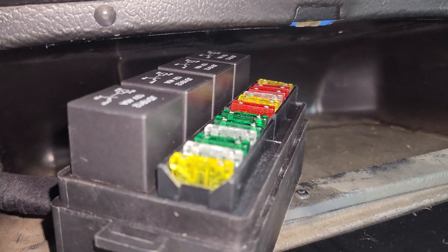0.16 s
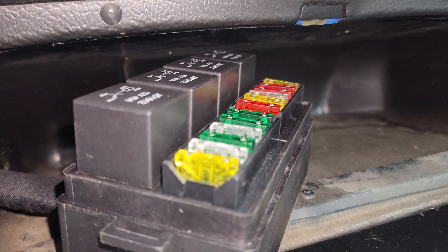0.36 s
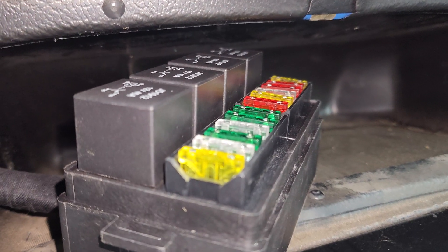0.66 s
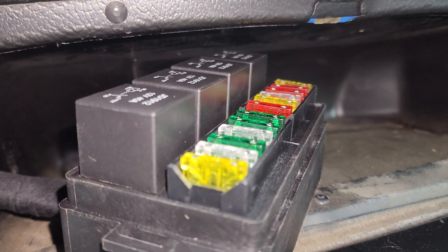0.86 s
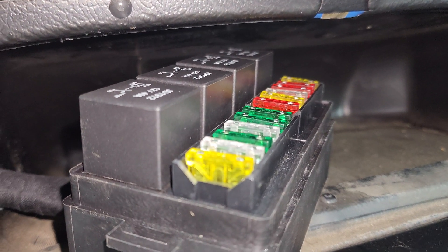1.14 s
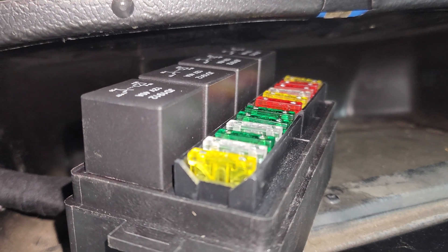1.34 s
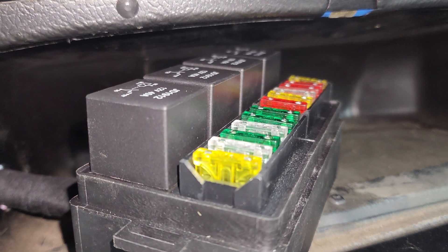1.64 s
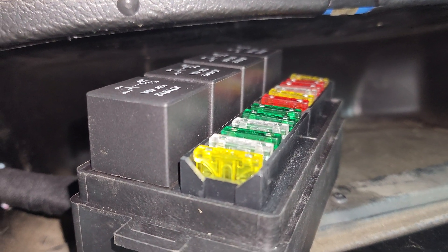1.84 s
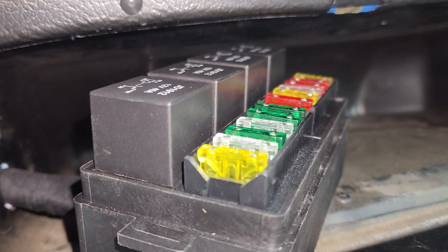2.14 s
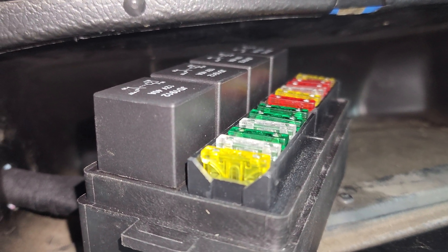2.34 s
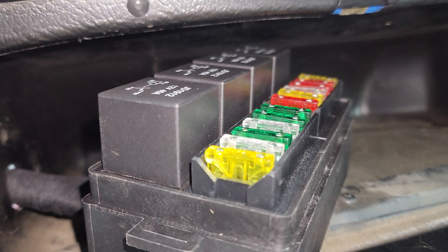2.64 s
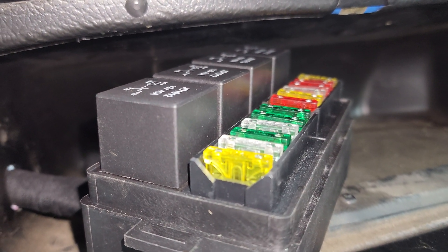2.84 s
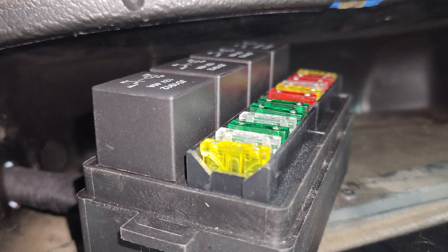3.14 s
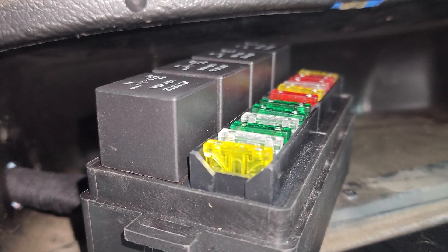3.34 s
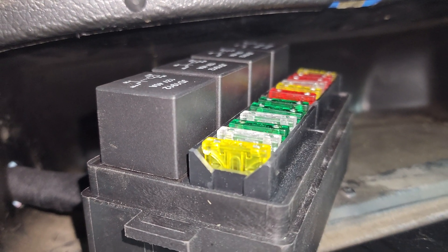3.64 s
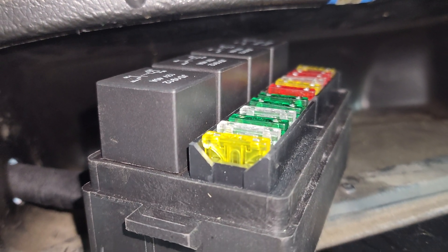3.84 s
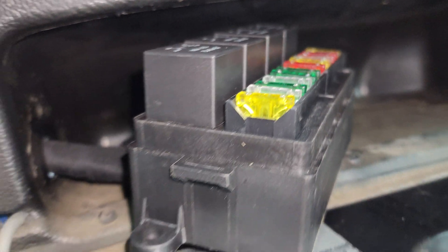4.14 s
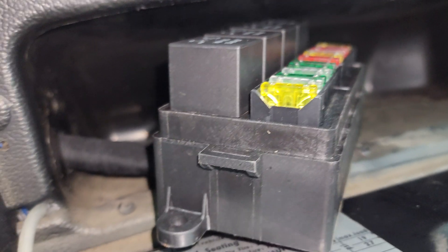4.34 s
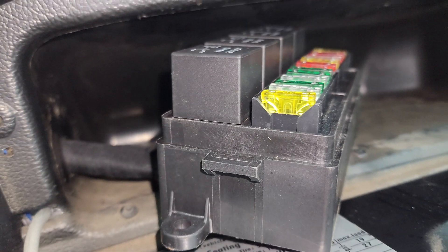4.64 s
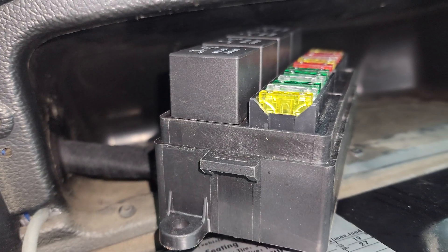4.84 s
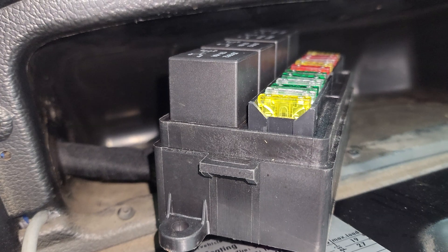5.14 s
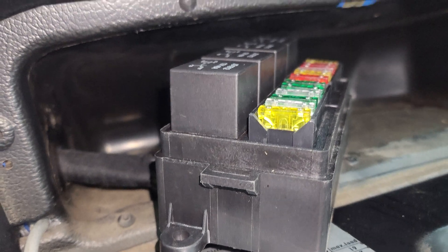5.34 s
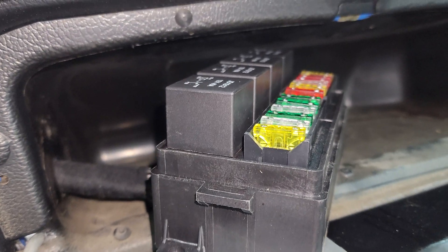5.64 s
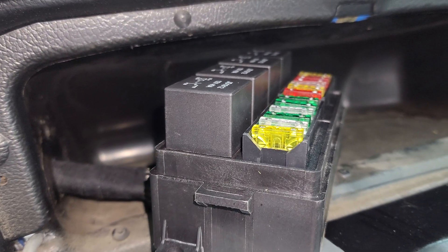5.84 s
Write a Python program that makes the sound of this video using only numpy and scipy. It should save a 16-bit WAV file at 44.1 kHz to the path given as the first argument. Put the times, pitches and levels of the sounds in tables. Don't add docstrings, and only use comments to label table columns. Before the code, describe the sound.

Four sharp relay pull-ins and three louder drop-outs, each ringing the hard plastic case with a small thud. Between each pair a fuel pump gives a rough, buzzy mid-pitched whir with a light hiss, heard through its hose. Fumbling fingers, scuffs and faint sleeve swishes surround the switching. A quiet yard and wavering far hum lie beneath the close phone pickup.

```python
import sys
import numpy as np
from scipy import signal
from scipy.fft import rfft, irfft
from scipy.io import wavfile
from scipy.ndimage import uniform_filter1d

SR = 44100
rng = np.random.default_rng(int(sys.argv[2]) if len(sys.argv) > 2 else 0)


def store_wav(level_fs):
    pcm = np.round(np.clip(np.atleast_2d(level_fs), -1, 1) * 32767)
    wavfile.write(sys.argv[1], SR, pcm.T.astype(np.int16))


def amplitude_ratio(level_db):
    exponent = np.asarray(level_db, float) / 20
    return 10 ** exponent


N = 263892
T = np.arange(N) / SR


def noise(n=N):
    return rng.standard_normal(n)


def colour(x, shape):
    hz, db = np.transpose(shape)
    f = np.arange(len(x) // 2 + 1) * SR / len(x) + 1
    gain_db = np.interp(np.log(f), np.log(hz), db)
    return irfft(rfft(x) * amplitude_ratio(gain_db), len(x))


def unit(x):
    return x / np.sqrt(np.mean(x ** 2))


def band(x, lo_hz, hi_hz):
    return signal.sosfilt(signal.butter(4, [lo_hz, hi_hz], "band", fs=SR, output="sos"), x)


def walk(rate_hz):
    k = int(SR / rate_hz)
    held = np.repeat(noise(N // k + 1), k)
    return 1.5 * uniform_filter1d(uniform_filter1d(held, k), k)[:N]


def decay(t, t60_s):
    return (t >= 0) * np.exp(-np.log(1000) * np.maximum(t, 0) / t60_s)


def sine(hz, t):
    return np.sin(2 * np.pi * hz * t)


def add(out, x, s):
    i = int(s * SR)
    out[i:i + len(x)] += x[:N - i]


def yard():
    # (frequency [Hz], level [dB per Hz])
    murmur_shape = [(15, -81), (25, -49), (92, -28.5), (159, -29.5), (175, -13), (210, -11.5), (238, -8),
                    (338, -14.5), (384, -4.5), (406, -13), (525, -16), (607, -20.5), (2000, -51),
                    (2600, -88.5), (4400, -120)]
    mic_shape = [(1000, -12), (2000, -6), (3200, -5), (4800, 2), (6800, -2), (7200, -7), (13500, -7),
                 (15700, -9), (15800, -32)]
    murmur = amplitude_ratio(-55 + 1.2 * walk(3.7)) * unit(colour(noise(), murmur_shape))
    return murmur + amplitude_ratio(-76.14) * unit(colour(noise(), mic_shape))


def hum():
    # (multiple [-], level [dB rms])
    multiples = [(3, -74.5), (4, -65.5), (6, -65), (8, -62), (11, -70.5)]
    # (time [s], half width [s], depth [dB])
    fades = [
        (0, .06, -10),
        (1.33, 0.09, -17),
        (2.83, .04, -14),
        (3.95, 0.092, -14),
        (5.1, .06, -16),
        (5.58, 0.068, -16),
    ]
    shaft_hz, beat_hz, in_step_s = 47.64, 1.84, .424
    fifth_db, neighbour_db = -54.5, -10
    turn = 2 * np.pi * np.cumsum(shaft_hz + 0.047 * walk(1.966)) / SR
    fade_db = sum(db * np.exp(-.5 * ((T - s) / width_s) ** 2) for s, width_s, db in fades)
    neighbour = np.sin(5 * turn + 2 * np.pi * beat_hz * (T - in_step_s))
    pair = np.sin(5 * turn) + amplitude_ratio(neighbour_db) * neighbour
    out = amplitude_ratio(fifth_db + fade_db + 1.5 * walk(6.2)) * pair
    for k, db in multiples:
        out += amplitude_ratio(db + 2.4 * walk(5)) * np.sin(round(k) * turn + 6 * rng.random())
    return np.sqrt(2) * out


def hand():
    # (strongest [s], scuff level [dB], time per 20 dB of swell [s], rumble re scuff [dB])
    moves = [(0, -45, 0.02, -1), (.67, -57, .16, 6), (.97, -58, .15, 3), (.83, -35.5, 0.1129, -13),
             (1.17, -52, .15, -10), (1.36, -54, .15, -6), (1.66, -57, 0.34, -10), (2.17, -49, .2, -10),
             (2.3, -52, .1, -4), (2.76, -54, .12, -8), (3.05, -54, 0.35, -2.5), (3.55, -53.5, 0.43, -10),
             (4.31, -50.5, 0.36, -10.5), (4.78, -50.5, .22, -9), (5.5, -58, .3, -3), (5.66, -59, .15, -3),
             (5.98, -46.5, .1, -11)]
    # (start [s], length [s], level [dB])
    swishes = [
        (.46, .42, -75),
        (.9, .3, -88),
        (2.0, .2, -84),
        (2.68, 0.12, -85.5),
        (3.3, .4, -86),
        (4.05, .42, -76),
        (4.55, .2, -86),
        (5.4, .18, -83),
    ]
    rest_db, rest_rumble_db, fade_share = -76, -73, 0.93
    rise_s, fall_s = .07, 0.14
    scuff, rumble, swish = amplitude_ratio(rest_db), amplitude_ratio(rest_rumble_db), 0
    for s, db, slope_s, rumble_db in moves:
        away_s = np.maximum(s - T, (T - s) / fade_share)
        move = amplitude_ratio(db - 20 * away_s / slope_s)
        scuff = scuff + move
        rumble = rumble + amplitude_ratio(rumble_db) * move
    for s, length_s, db in swishes:
        rise = np.clip((T - s) / rise_s, 0, 1)
        fall = np.exp(-np.maximum(T - s - length_s, 0) / fall_s)
        swish = swish + amplitude_ratio(db) * rise * fall
    rustle = amplitude_ratio(-20) * scuff + amplitude_ratio(3) * swish

    def rub(size, lo_hz, hi_hz, trim_db, lumpy_db):
        return unit(band(noise(), lo_hz, hi_hz)) * size * amplitude_ratio(trim_db + lumpy_db * walk(25))

    out = rub(rumble, 70, 170, -2, 3) + rub(scuff, 250, 1050, -5, 3)
    out += rub(rustle, 2500, 7000, -3, 1.5) + rub(swish, 13100, 14800, -3, 2.5)
    return out + unit(band(noise(), 8500, 10500)) * swish * amplitude_ratio(-6.5)


def taps():
    # (time [s], peak level [dB], ring [Hz], nail tick re ring [dB])
    finger_taps = [(0.603, -36, 1090, -21), (0.730, -30, 1410, -10), (0.774, -28.5, 1220, -6),
                   (1.11, -53, 1900, -6), (1.154, -41.5, 1300, -19), (1.172, -44, 1100, -22),
                   (1.19, -48, 1450, -20), (1.245, -47, 1550, -9), (1.255, -47, 1500, -12),
                   (1.311, -37, 1440, -20), (1.329, -44, 1550, -16), (1.352, -34.5, 1000, -14.5),
                   (1.41, -43.5, 1400, -18), (2.135, -36.5, 1380, -14), (2.748, -45, 1300, -12),
                   (2.822, -41.5, 1670, -22), (2.995, -33, 1380, -24), (3.372, -35, 1460, -26),
                   (3.549, -33.5, 1360, -21), (3.691, -37, 1340, -26), (4.314, -30.5, 1390, -21),
                   (4.325, -31, 1210, -17), (4.425, -28, 1330, -12.5), (4.665, -27, 1420, -10.5),
                   (5.412, -41.5, 935, -18), (5.444, -31.5, 1405, -11), (5.527, -35, 1420, -11),
                   (5.631, -32, 1350, -20), (5.836, -38, 1370, -9), (5.947, -36.5, 1690, -15)]
    # (time [s], peak level [dB])
    further_taps = [(1.368, -47), (1.524, -44), (2.1, -42), (2.18, -40.5), (2.695, -54), (2.784, -49),
                    (2.953, -35), (3.587, -39), (4.247, -41), (4.334, -36), (4.436, -40), (4.687, -39),
                    (4.754, -31.5), (4.811, -36), (4.878, -45.5), (5.458, -40), (5.547, -37), (5.891, -35)]
    further_hz, further_tick_db = 1420, -13
    out, t = np.zeros(N), np.arange(int(.05 * SR)) / SR
    body = unit(band(noise(), 300, 1900))
    edge = unit(band(noise(), 2200, 6000))
    air = unit(band(noise(), 5000, 15500))
    rows = [*finger_taps, *[(s, db, further_hz, further_tick_db) for s, db in further_taps]]
    for (s, db, hz, tick_db), vary in zip(rows, rng.standard_normal((len(rows), 4))):
        treble_db = db + tick_db
        thump_db = -37.5 + .4 * (db + 41)
        air_db = -81.5 + 1.3 * (treble_db + 56)
        here = (int(s * SR) + np.arange(len(t))) % N
        ring = sine(hz, t) * decay(t, 0.021) + .3 * body[here] * decay(t, .035)
        ring = ring * np.clip(t / .0015, 0, 1)
        thump = -sine(190 * (1 + 0.18 * vary[0]), t) * decay(t, 0.023)
        low = sine(2750 * (1 + 0.099 * vary[1]), t)
        high = sine(3900 * (1 + 0.029 * vary[2]), t)
        pair = low + amplitude_ratio(-5.0 + 6.2 * vary[3]) * high
        tick = (pair + 0.52 * edge[here]) * decay(t, 0.015) * np.clip(t / 0.0011, 0, 1)
        add(out, amplitude_ratio(db - 1) * ring + amplitude_ratio(thump_db) * thump + amplitude_ratio(treble_db - 2.5) * tick, s + .0006)
        add(out, amplitude_ratio(air_db) * air[here] * decay(t, 0.015), s + 0.00093)
    return out + hand_slaps(body)


def hand_slaps(body):
    # (time [s], peak level [dB], ring [Hz], ring t60 [s])
    slaps = [(0.036, -39, 565, 0.023), (0.044, -50, 423, 0.03), (0.788, -24, 540, 0.034),
             (0.807, -24.5, 550, 0.03), (0.82, -18.5, 910, 0.028), (0.831, -16, 570, 0.015),
             (0.837, -16.5, 520, 0.021), (0.847, -29, 534, 0.021), (0.855, -26.5, 483, 0.03),
             (0.867, -32, 495, 0.04), (.84, -29, 105, 0.19), (0.028, -42, 108, 0.18)]
    out, t = np.zeros(N), np.arange(int(.3 * SR)) / SR
    for s, db, hz, t60_s in slaps:
        grit = 0.3 * (hz > 300) * np.roll(body, -int(s * SR))[:len(t)]
        rise = np.clip(t * hz / 1.77, 0, 1)
        add(out, amplitude_ratio(db + 1.0) * (sine(hz, t) + grit) * decay(t, 0.94 * t60_s) * rise, s)
    return out


def pump():
    # (on [s], off [s], one throb [s], turn rate at on [Hz], at off [Hz], level [dB])
    runs = [
        (.03, .79, .520, 28.73, 28.70, .3),
        (1.548, 2.245, 1.763, 28.73, 28.70, 0),
        (2.916, 4.78, 3.236, 28.70, 28.645, 0),
        (5.872, 6.1, 5.947, 28.73, 28.72, 0),
    ]
    # (frequency [Hz], level [dB rms])
    strong_lines = [(689.1, -74), (716.0, -73), (775.2, -69), (802.1, -70), (829.0, -73), (861.3, -70),
                    (974.4, -69), (1001, -69), (1061, -73), (1087, -69), (1206, -72), (1233, -68),
                    (1260, -67), (1346, -58), (1378, -61), (1405, -60), (1432, -66), (1464, -62),
                    (1491, -66), (1550, -63), (1577, -67), (1663, -72), (1690, -64), (1723, -70),
                    (1750, -75), (1776, -72), (1809, -69), (1863, -78), (1895, -75), (1949, -81)]
    # (frequency [Hz], level [dB per Hz])
    fuel_shape = [(600, 0.5), (900, -5.5), (1400, -2), (1850, -4), (2150, -16), (2600, -22), (4500, -23),
                  (7000, -32)]
    # (share of the turn [-], level [dB])
    knocks = [(0.0362, 0.0), (0.1413, -1.9), (0.2465, -8.2), (0.353, -0.5), (0.4382, -3.6), (0.5105, -2.9),
              (0.6648, -2.1), (0.8267, -8.7)]
    turn_hz, fuel_db, fuel_throb = 28.68, -63, .15
    lull_share, lull_width, lull_db = .85, .08, -8
    out, fuel = np.zeros(N), unit(colour(noise(), fuel_shape))

    k = np.arange(16, 92)
    hz, db = np.transpose(fuel_shape)
    line_db = np.interp(np.log(k * turn_hz), np.log(hz), db) - 79.0 + 3 * noise(len(k))
    for line_hz, strong_db in strong_lines:
        line_db[k == round(line_hz / turn_hz)] = strong_db + .5

    share, knock_db = np.transpose(knocks)
    lag = np.angle(np.exp(-2j * np.pi * np.outer(k, share)) @ amplitude_ratio(knock_db))
    lag = np.where(k * turn_hz < 1150, 2 * np.pi * rng.random(len(k)), lag)
    angle = np.linspace(0, 1, 4097)
    one_turn = np.sqrt(2) * np.cos(2 * np.pi * np.outer(angle, k) + lag) @ amplitude_ratio(line_db)

    wander_hz, swell_db = .01 * walk(3), .8 * walk(6)
    lull = 1
    for on, off, throb, hz0, hz1, run_db in runs:
        turns = np.cumsum(np.interp(T, [on, off], [hz0, hz1]) + wander_hz) / SR
        turns -= turns[int(throb * SR)]
        gate = np.clip((T - on) / .04, 0, 1) * np.exp(-np.maximum(T - off, 0) / .018)
        tone = np.interp(turns % 1, angle, one_turn)
        tone += amplitude_ratio(fuel_db) * fuel * (1 + fuel_throb * np.cos(2 * np.pi * turns))
        dip = np.exp(-.5 * ((turns % 1 - lull_share) / lull_width) ** 2)
        lull = np.where(T > on, amplitude_ratio(lull_db * dip), lull)
        out += gate * tone * amplitude_ratio(run_db + swell_db)
    return out - (1 - lull) * colour(out, [(1000, -40), (1250, 0)])


def snap(bounces, modes, panel, crack_db, tail_db, tail_t60_s, rattle_db):
    # (frequency [Hz], level [dB per Hz])
    crack_shape = [(1000, -38.5), (1700, -19), (2530, -9.5), (3770, -0.5), (4430, -7.5), (5460, -3.5),
                   (7390, -10), (7680, -8), (14000, -9.5), (15600, -19.5), (16400, -31)]
    t = np.arange(int(.3 * SR)) / SR
    contact, gate = 0, amplitude_ratio(tail_db) * decay(t, tail_t60_s)
    for (ms, db), vary in zip(bounces, rng.standard_normal((len(bounces), 2))):
        since = t - abs(ms + 0.23 * vary[0]) / 1000
        size = amplitude_ratio(db + vary[1])
        contact = contact + size * decay(since, 0.0031)
        gate = gate + size * decay(since, 0.013)
    rattle = amplitude_ratio(rattle_db) * decay(t, 1.37 * tail_t60_s) * unit(band(noise(len(t)), 2000, 7900))

    hz, mode_db, t60_s = np.transpose(modes)[:, :, None]
    case = np.sum(amplitude_ratio(mode_db) * decay(t, .3 * t60_s) * sine(hz, t), axis=0)
    shake = contact * noise(len(t)) + rattle
    ring = band(signal.fftconvolve(shake, case)[:len(t)], 2000, 17000)
    crack = gate * unit(colour(noise(len(t)), crack_shape))
    out = amplitude_ratio(-23.5) * unit(unit(ring) + amplitude_ratio(crack_db) * unit(crack))

    thud = np.clip(t / .005, 0, 1) * decay(t, .09)
    out += amplitude_ratio(-25) * thud * unit(band(noise(len(t)), 150, 1700))
    for (hz, db, t60_s, rise_ms), vary in zip(panel, rng.standard_normal((len(panel), 2))):
        rise = np.clip(1000 * t / rise_ms, 0, 1) ** 2
        swell = rise * decay(np.maximum(t - rise_ms / 1000, 0), t60_s)
        beat = 1 + 0.94 * np.sin(2 * np.pi * 45 * t + 3 * vary[1])
        out += amplitude_ratio(db + 1.5 * vary[0]) * swell * beat * sine(hz, t)
    return out


def relay():
    # (time [s], peak level [dB])
    pull_in = [
        (0.0116, -18.5),
        (1.5314, -13.5),
        (2.9001, -14),
        (5.8546, -13.5),
    ]
    drop_out = [
        (0.7784, -10),
        (2.2284, -11.5),
        (4.7637, -10.5),
    ]
    # (time after first contact [ms], level [dB])
    in_bounce = [(0, 1.5), (1.6, -2), (3.5, -6.5), (6, -8.5), (12, -9.5), (15, -12), (25, -20)]
    out_bounce = [(0, -0.5), (1.5, -3), (3.2, 0), (6.5, -9), (9, -10), (13.5, -10), (17, -13.5)]
    # (frequency [Hz], level [dB], t60 [s])
    in_modes = [(2171, -22, 0.1), (2627, 2, 0.055), (3860, 4, 0.046), (4600, -14, 0.053), (5370, -8, 0.16),
                (6040, -16.5, 0.095), (7590, -8, 0.034), (10400, -6.5, 0.062), (12000, -14.5, 0.057),
                (12900, -20.5, 0.096), (13230, -7.5, 0.067), (13800, -16.5, 0.14), (14140, -4.5, 0.053),
                (15300, -18, 0.11), (4570, -9.5, 0.0085), (3314, -9.5, 0.081)]
    out_modes = [(3060, -22, 0.19), (3460, -10, 0.073), (3646, -9.0, 0.2), (5415, 4, 0.076),
                 (6155, -3.5, 0.075), (7900, -19.5, 0.081), (7900, -5.5, 0.06), (9440, -14.5, 0.12),
                 (9835, -4.5, 0.085), (10880, -9, 0.097), (11100, -19.5, 0.057), (13230, -14, 0.077),
                 (15700, -25, 0.095), (3230, 5, .04), (5860, -4.5, 0.041), (14380, -13, 0.061),
                 (4350, -8.0, 0.041), (2533, -16.5, 0.017)]
    # (frequency [Hz], level [dB], t60 [s], rise [ms])
    in_panel = [(337.6, -22.5, 0.07, 13), (582, -31, 0.099, 18.2), (945, -35.5, 0.039, 5.2),
                (1557, -30, 0.056, 18), (1800, -38.5, 0.059, 2.8)]
    out_panel = [(377.8, -18, 0.12, 10), (873, -25.5, .06, 9), (1242, -20, .07, 9.8),
                 (1400, -25.5, 0.024, 2.5), (1850, -28, .14, 9.8)]
    out = np.zeros(N)
    for s, db in pull_in:
        hit = snap(in_bounce, in_modes, in_panel, crack_db=-6.0, tail_db=-12, tail_t60_s=0.22, rattle_db=-43)
        add(out, amplitude_ratio(db - 2) * hit, s)
    for s, db in drop_out:
        hit = snap(out_bounce, out_modes, out_panel, crack_db=-2.0, tail_db=-12.0, tail_t60_s=0.2,
                   rattle_db=-37)
        add(out, amplitude_ratio(db - 3) * hit, s)
    return out


def scene():
    return (yard() + hum() + hand() + taps() + pump() + relay())[None]


def low_pass(x):
    return signal.sosfilt(signal.butter(12, 16810, fs=SR, output="sos"), x)


def record(dry):
    cut = signal.sosfilt(signal.butter(3, 62, "high", fs=SR, output="sos"), dry)
    cut = signal.sosfilt(signal.ellip(8, .3, 60, 16450, fs=SR, output="sos"), cut)
    return low_pass(cut)


dry = scene()
out = record(dry)
store_wav(out)
```